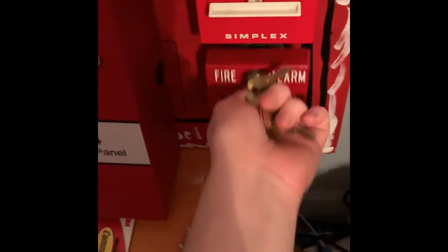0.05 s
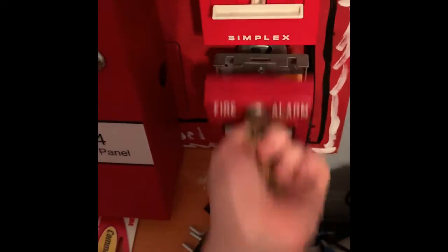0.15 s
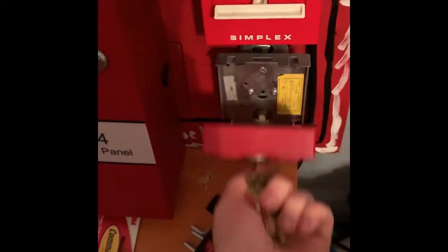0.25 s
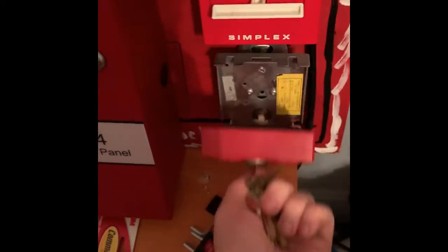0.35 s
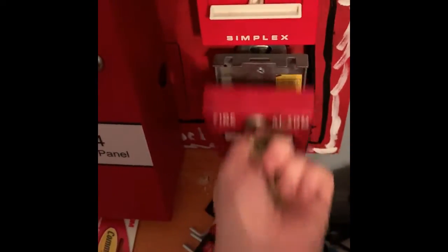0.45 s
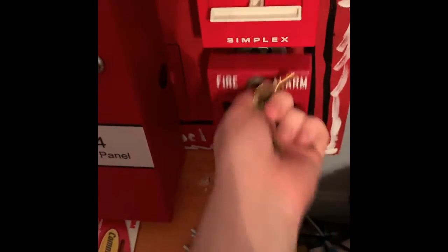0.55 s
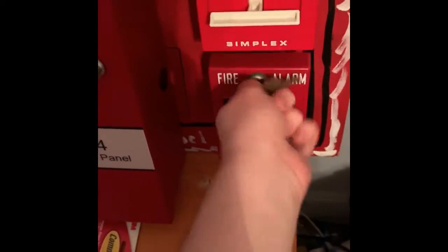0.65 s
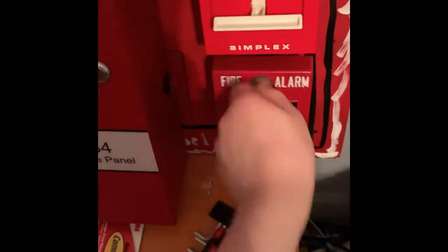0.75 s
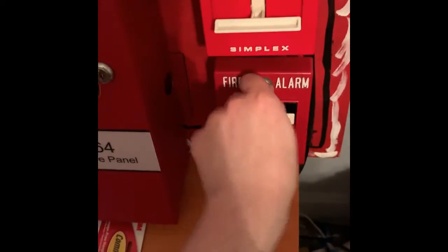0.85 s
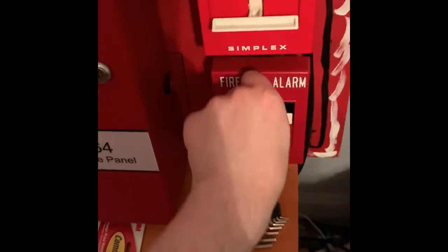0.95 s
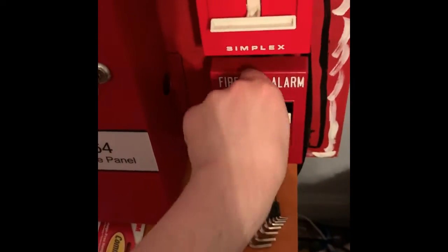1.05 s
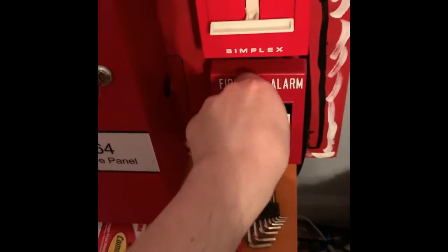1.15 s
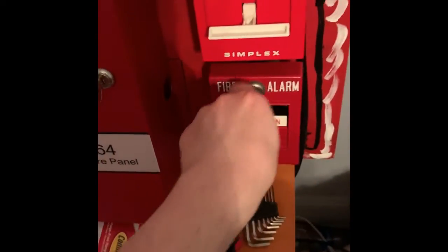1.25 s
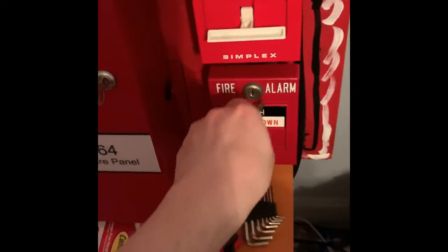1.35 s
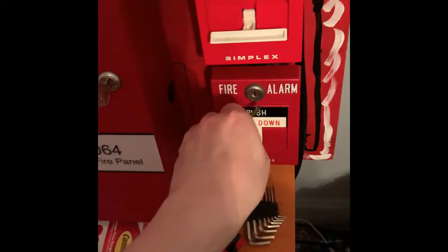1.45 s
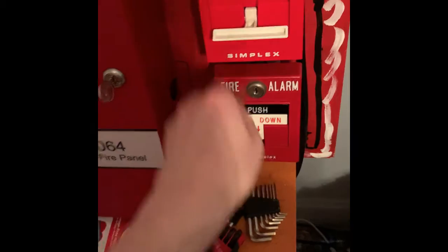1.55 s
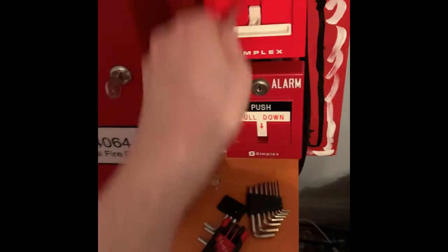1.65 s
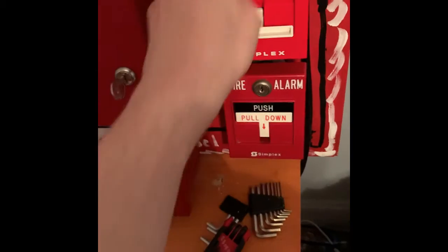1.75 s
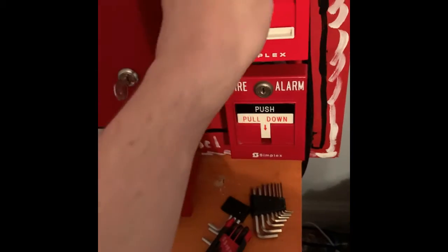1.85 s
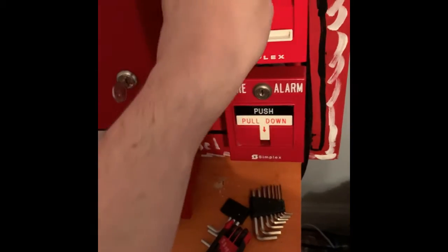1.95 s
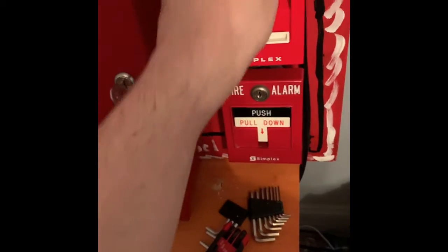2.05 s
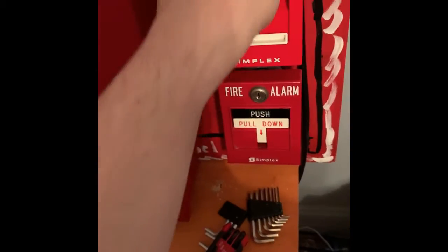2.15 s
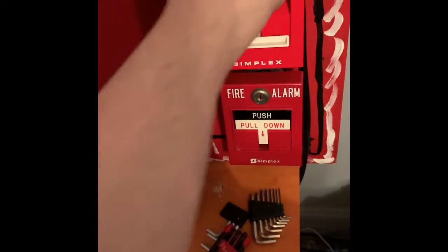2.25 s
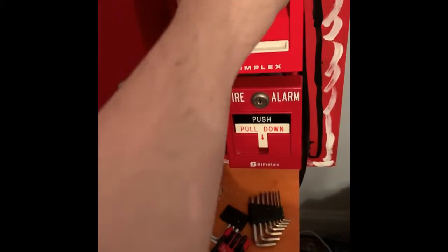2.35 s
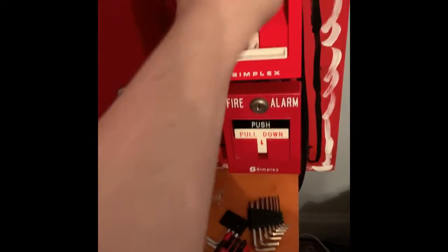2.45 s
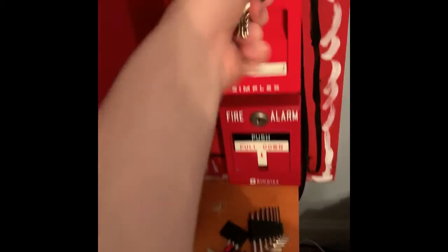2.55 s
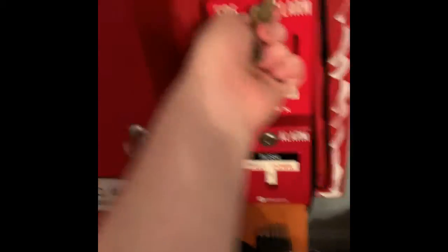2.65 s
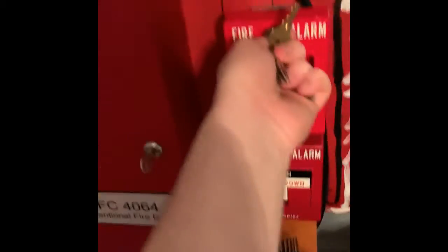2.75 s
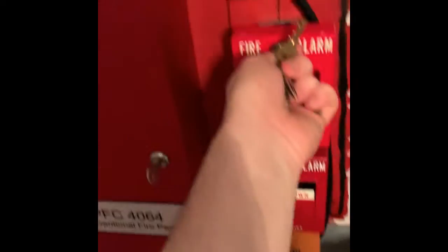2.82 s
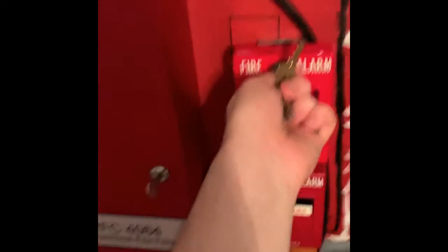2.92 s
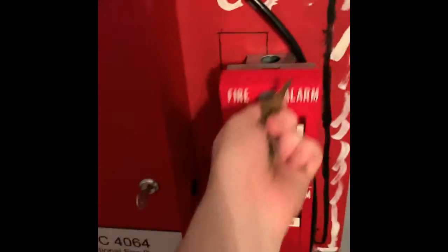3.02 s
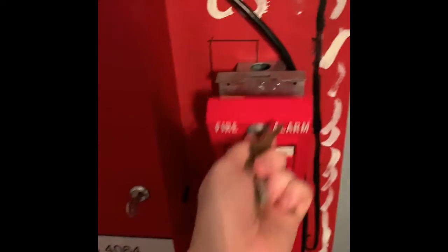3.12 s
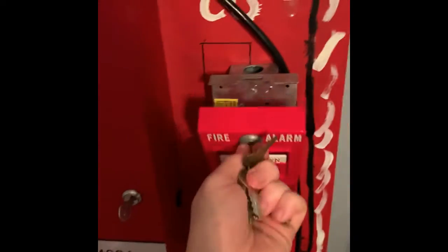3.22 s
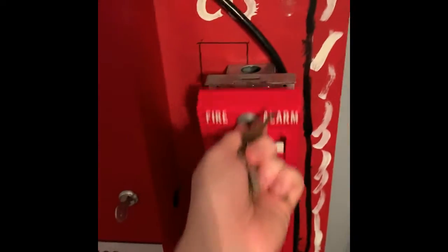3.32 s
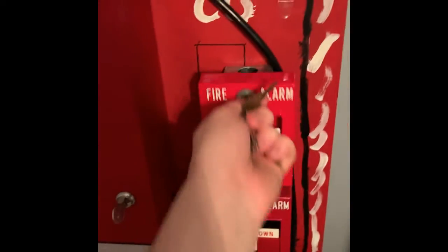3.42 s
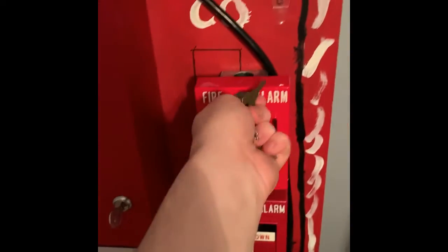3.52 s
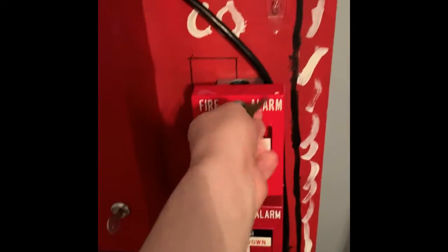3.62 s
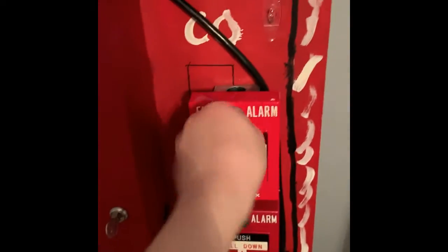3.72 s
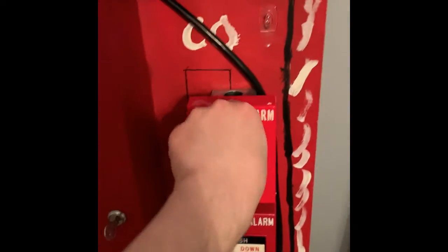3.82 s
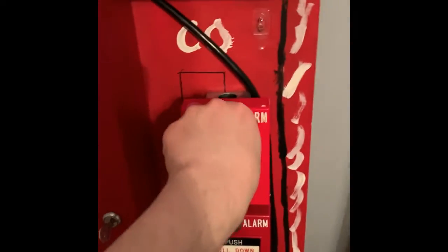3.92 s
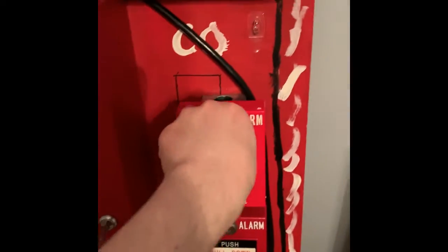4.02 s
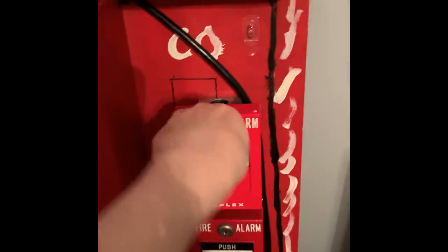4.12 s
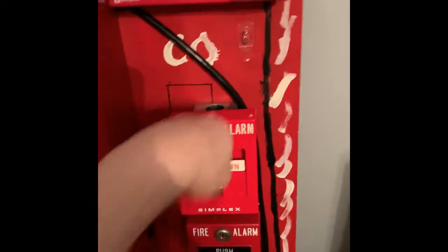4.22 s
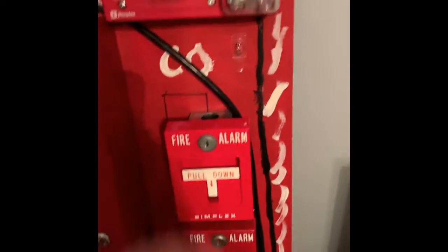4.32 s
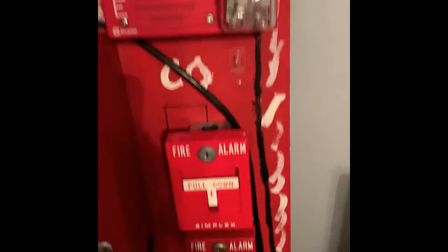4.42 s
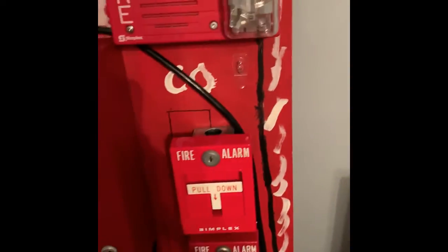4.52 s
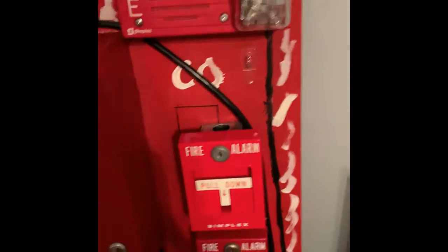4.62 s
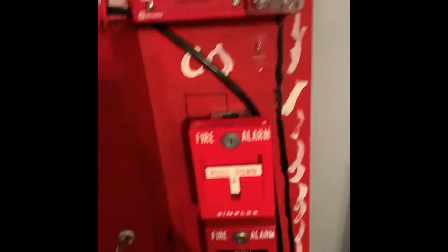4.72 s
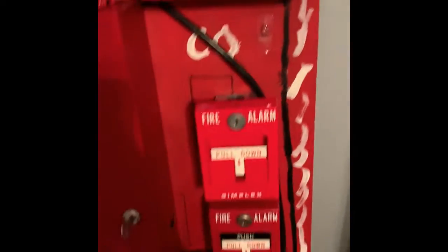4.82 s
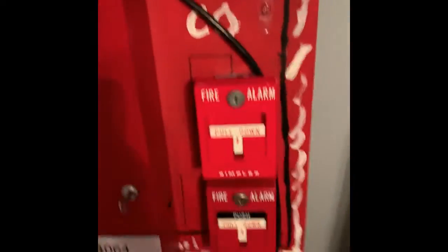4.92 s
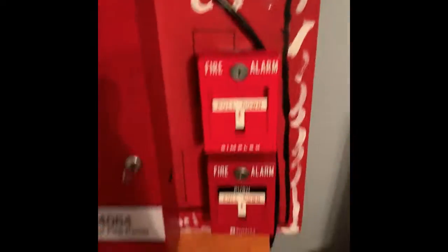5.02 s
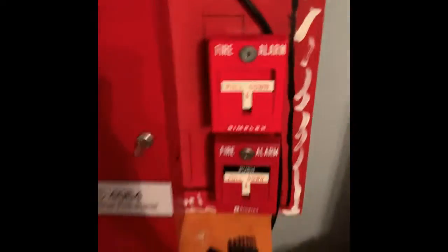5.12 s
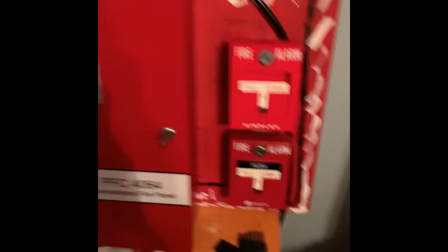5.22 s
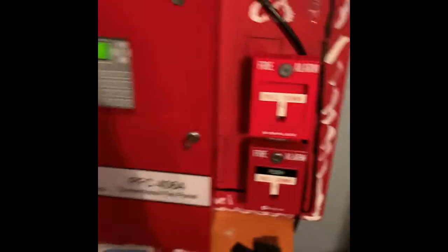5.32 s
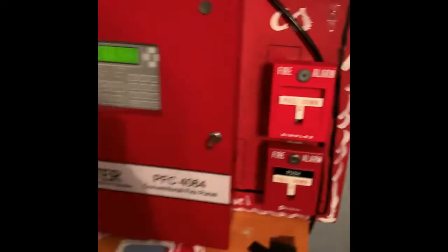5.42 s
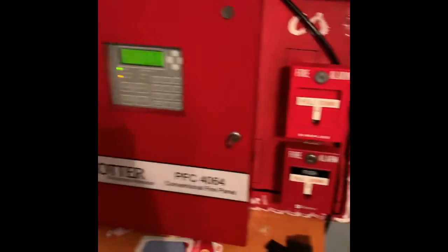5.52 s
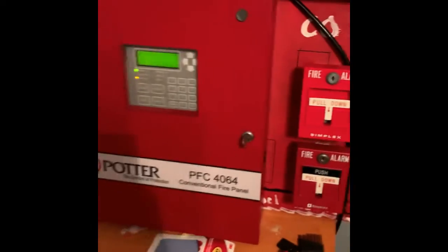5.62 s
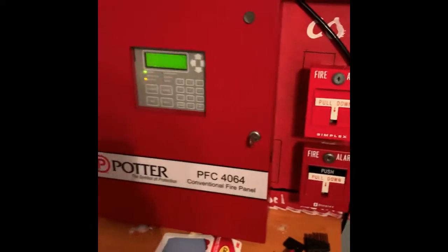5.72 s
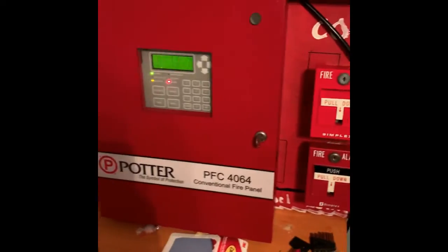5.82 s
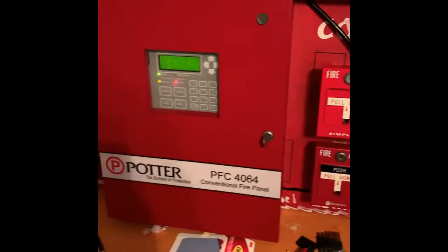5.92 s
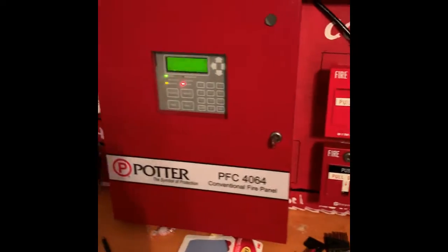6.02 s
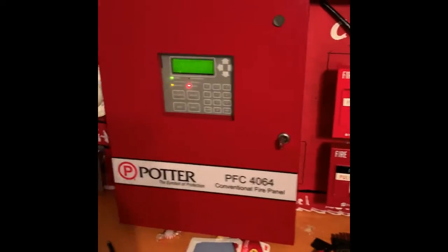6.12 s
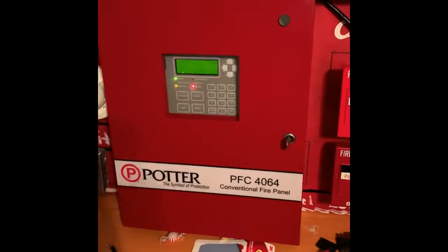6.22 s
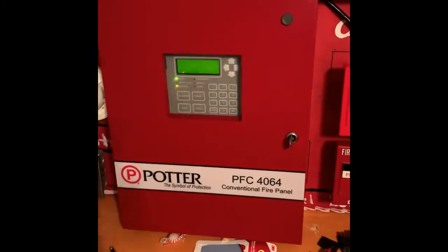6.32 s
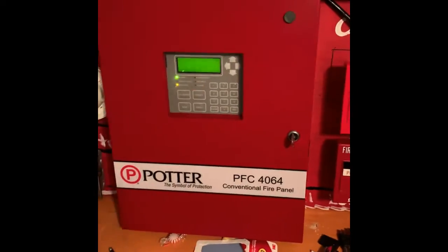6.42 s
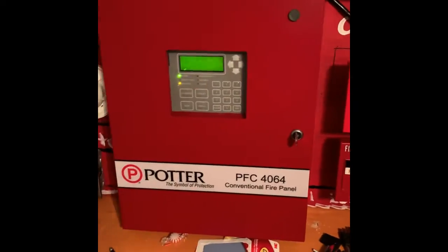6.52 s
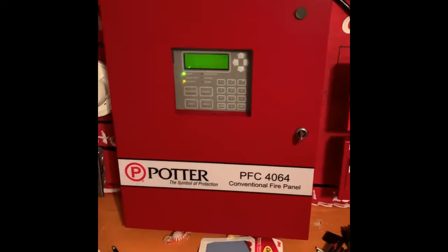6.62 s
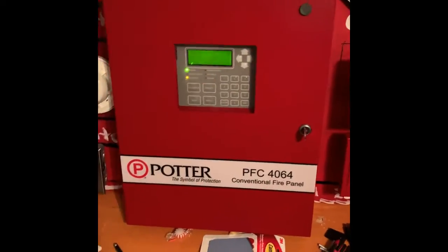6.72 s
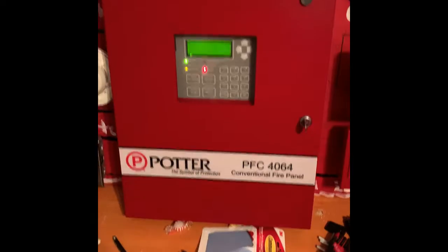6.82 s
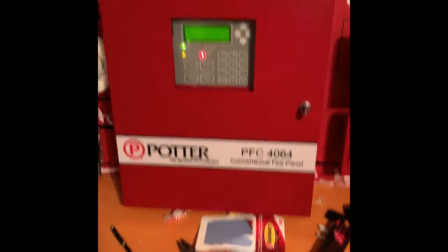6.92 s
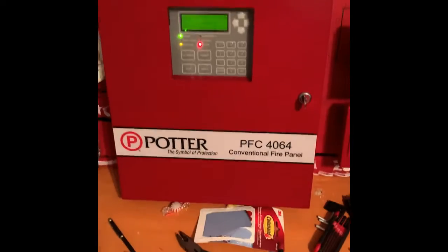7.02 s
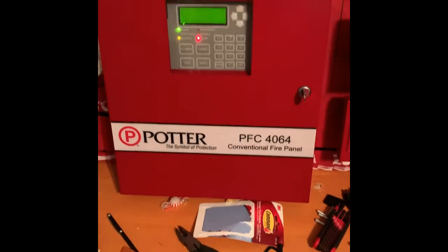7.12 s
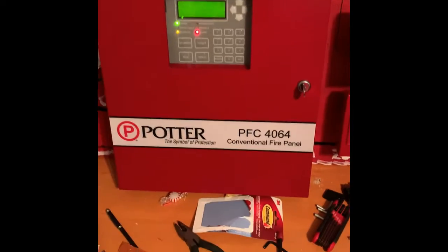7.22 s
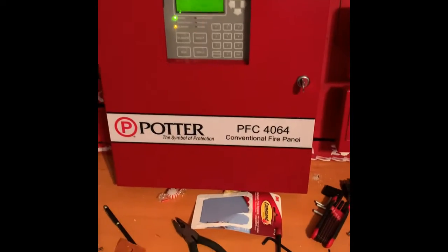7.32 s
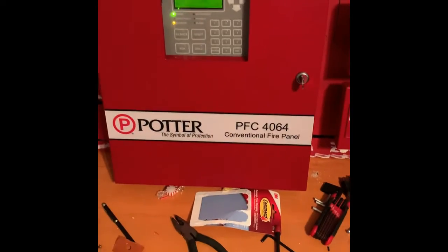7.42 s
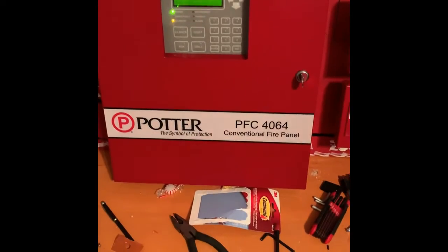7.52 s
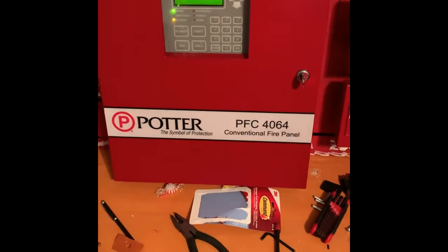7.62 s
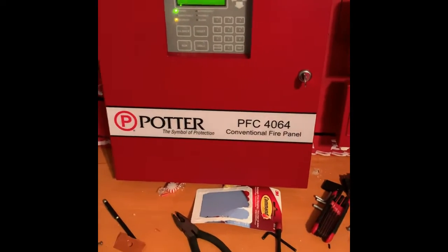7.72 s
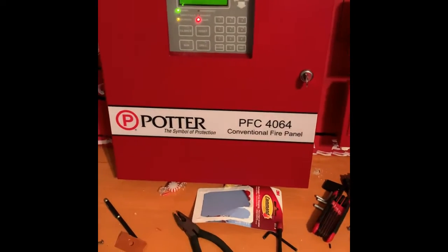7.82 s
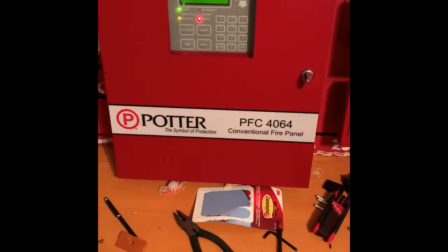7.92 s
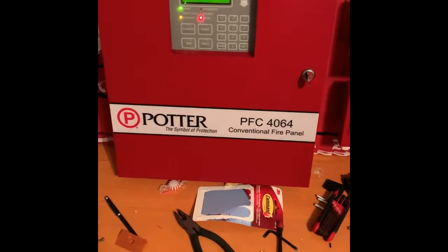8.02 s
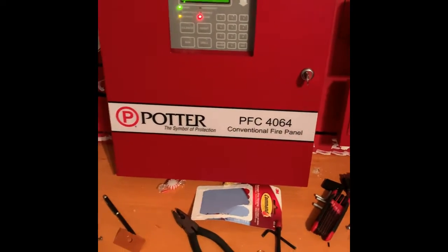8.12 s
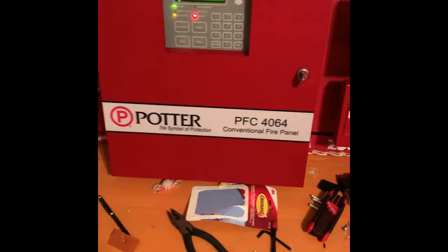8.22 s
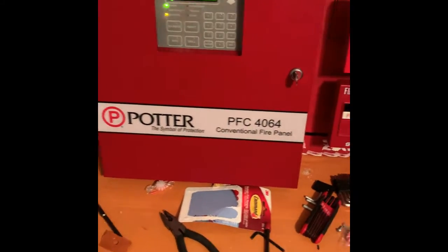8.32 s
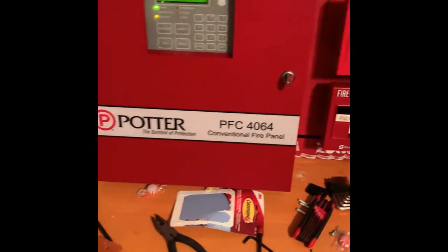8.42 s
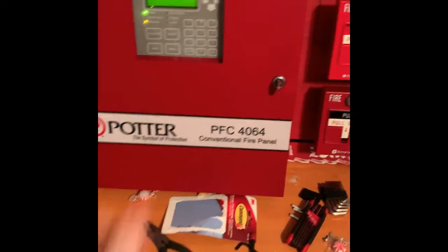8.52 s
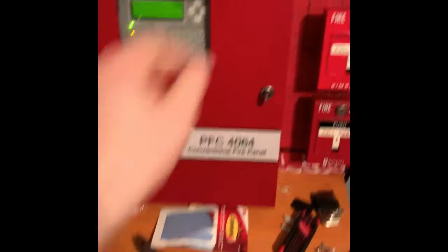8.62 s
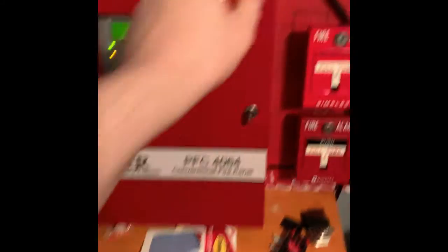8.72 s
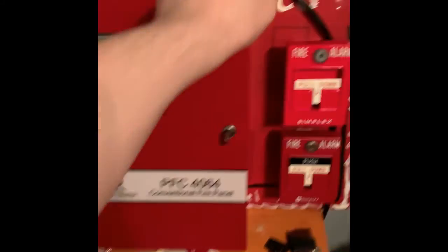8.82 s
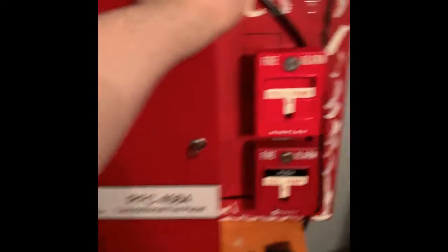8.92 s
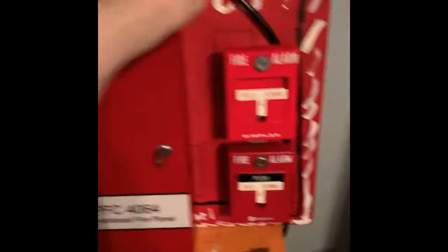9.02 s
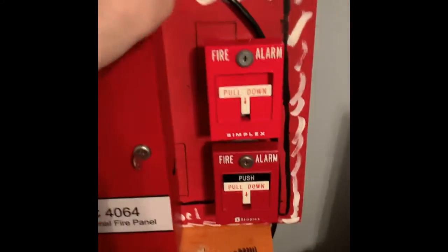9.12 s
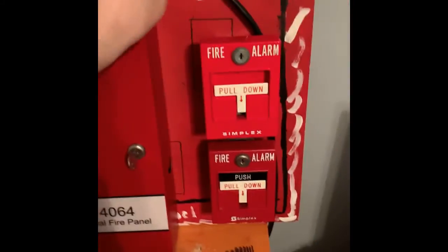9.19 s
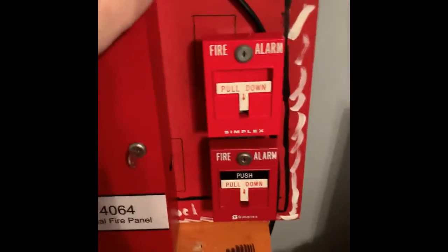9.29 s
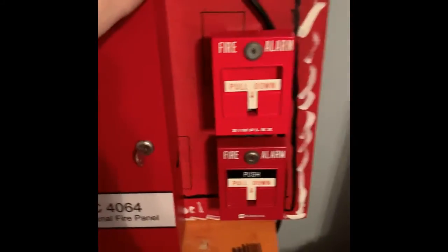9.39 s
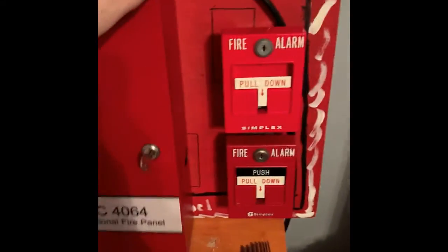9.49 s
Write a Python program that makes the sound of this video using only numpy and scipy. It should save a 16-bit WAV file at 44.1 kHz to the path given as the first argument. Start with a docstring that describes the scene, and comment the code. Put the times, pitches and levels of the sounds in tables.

```python
"""Two metal fire alarm pull stations are worked by a hand in a small room, close to the microphone.
A key slides into each lock and turns, the hinged cover drops open and is slammed shut, the key is drawn out.
Then a sleeve brushes past, the key ring jingles, and a few duller knocks come from the supporting board.
Impacts are noise bursts with decaying modes; friction is a train of random slips shaped by spectra and swells;
the rumble and room tone are filtered noise. Decaying noise serves as the echo of the room."""
import sys
import numpy as np
from scipy import signal
from scipy.fft import rfft, irfft, next_fast_len
from scipy.io import wavfile

SR = 44100
rng = np.random.default_rng(int(sys.argv[2]) if len(sys.argv) > 2 else 0)


def wav_record(signal):
    """Record a signal, one row per channel, as 16-bit PCM in the file named by sys.argv[1]."""
    frames = np.transpose(np.atleast_2d(signal))
    bounded = np.clip(frames, -1, 1)
    # unit amplitude maps onto the largest positive 16-bit level
    quanta = np.round(bounded * 32767).astype(np.int16)
    wavfile.write(sys.argv[1], SR, quanta)


N = 421155
TIME = np.arange(N) / SR
RING_TIME = np.arange(SR // 3) / SR

# Tables. Levels are relative: a source may add a common gain. Spectra are amplitude densities.
# strokes of key over pins and cover against housing:
# (strongest at [s], rise [s], fall [s], body level [dB], bright level [dB])
RUBS = [(0.03, 0.23, 0.021, -41, -57.5), (0.599, .05, .2, -40, -54.5), (0.696, 0.13, .03, -38, -48),
        (0.739, 0.027, .015, -37, -42.5), (0.92, 0.29, 0.09, -43, -53), (0.978, .03, .25, -52.5, -63.5),
        (1.289, .03, .06, -30, -30), (1.40, .04, 0.022, -39, -35.5), (1.464, .01, 0.039, -35.5, -33.5),
        (2.215, .01, .13, -41.5, -57.5), (2.37, .02, .12, -32.5, -33.5), (2.432, .06, 0.027, -24, -26.5),
        (2.565, .01, .1, -45, -62), (2.657, 0.072, 0.2, -37.5, -47.5), (3.138, 0.027, .012, -21, -21.5),
        (3.431, .02, 0.084, -51.5, -72), (3.52, 0.04, 0.026, -50, -63), (3.828, 0.047, .035, -37, -51),
        (3.9, 0.07, .012, -37.5, -43), (4.253, 0.0098, .04, -29.5, -29), (4.292, 0.036, .025, -29, -20),
        (4.322, 0.017, .02, -27.5, -30)]
# spectrum of the body of the friction: (frequency [Hz], level [dB])
RUB_BODY_SPECTRUM = [(150, -41.5), (250, -14.5), (351, -5.5), (451, -17.5), (1150, -11.5), (1430, -19),
                     (2000, -15.5), (2880, -25), (5000, -29), (6500, -68), (11000, -120)]
# spectrum of the bright part of the friction: (frequency [Hz], level [dB])
RUB_BRIGHT_SPECTRUM = [(2650, -43), (4500, -17), (5840, 2.5), (11800, -11.5), (13500, -15), (15300, -14.5),
                       (16100, -13.5), (16500, -35)]
# modes of the cast housing and its cover: (frequency [Hz], mean level [dB], t60 [s])
HOUSING_MODES = [(227.6, -9, 0.25), (355, -4.5, 0.11), (540, -10, 0.1), (640, 1, 0.099), (800, -0.5, 0.11),
                 (945, -0.5, 0.075), (1136, -4.5, .14), (1243, -5, 0.077), (1595, -5, 0.11),
                 (1837, 3, 0.11), (2033, 3, 0.039), (2623, -5, 0.21), (3220, -2.5, 0.091), (3820, -6, 0.14),
                 (3980, 6, .12), (4240, 8, .14), (5810, -3.5, 0.18), (6370, -5, .15), (6795, -7, 0.1),
                 (7815, -13.5, 0.095), (9730, -2.5, 0.076), (10200, -7, .1)]
# continuous handling rumble: (time [s], level [dB])
HANDLING = [(0, -47), (1.0, -45.5), (1.85, -53.5), (2.8, -44), (3.25, -60.5), (3.8, -49.5), (4.2, -57.5),
            (4.5, -51.5), (6.4, -66), (8.5, -63.5), (9.5, -50.5)]
# the hand pushes against the board: (strongest at [s], level [dB])
PUSHES = [(0.46, -47.5), (0.77, -36), (1.34, -34), (1.55, -32.5), (2.02, -33), (2.25, -34), (2.47, -25.5),
          (2.73, -39), (3.44, -44), (3.635, -29.5), (4.38, -35), (6.54, -46), (9.44, -33)]
# spectrum of the board's rumble: (frequency [Hz], level [dB])
RUMBLE_SPECTRUM = [(18, -35), (30, -15), (54, -3), (113, 2), (150, 5), (219, -6), (291, -19), (360, -3.5),
                   (455, -17), (500, -16.5), (650, -41), (1100, -120)]
# spectrum of the room tone: (frequency [Hz], level [dB])
AIR_SPECTRUM = [(15, -36.5), (25, -8.5), (123, 0.5), (145, -15.5), (217, -15.5), (277, -2.5), (384, -18.5),
                (416, -27), (476, -22), (607, -26.5), (840, -20), (1330, -29.5), (4030, -42.5),
                (8590, -41.5), (16000, -44)]
# blows of latch, cover, key and hand: (time [s], metal level [dB], brightness [dB per octave],
# board thud level [dB], single resonance [Hz], ringing [dB])
BLOWS = [(0.026, -50, -5, -45, 1580, 8), (0.226, -31.5, -1, -48, 980, 9), (0.238, -38, -3, -53, 1000, -0.5),
         (0.268, -17, 1.7, -32, 2000, -3.5), (0.291, -30, -2.5, -49, 640, -5.5),
         (0.482, -50.5, -1.5, -64.5, 330, -7), (0.653, -48.5, -4.5, -51, 330, 5),
         (0.705, -32.5, -3, -26.5, 330, 1.5), (0.752, -19.5, -0.9, -24, 1200, -8.5),
         (0.939, -45.5, -4.5, -32.5, 220, -18.5), (1.04, -52.5, -2.5, -45, 200, -8),
         (1.261, -37.5, .5, -33.5, 340, 5.5), (1.287, -40.5, 1.5, -40, 1190, -15),
         (1.331, -38.5, -4.5, -31, 350, -3), (1.396, -48.5, 4, -44, 250, -12),
         (1.441, -35.5, 1.1, -36, 370, 6), (1.459, -46.5, -3.5, -33, 320, -15),
         (1.522, -60, -4, -39, 170, -5.5), (1.987, -34, 1, -34, 2010, 0),
         (1.997, -22.5, -0.04, -26, 800, -1.5), (2.139, -41.5, -3.5, -64, 1150, 3),
         (2.158, -41.5, -0.5, -57, 1630, -3), (2.198, -39.5, -3.1, -44, 910, 3),
         (2.33, -28, -1.5, -42, 1083, -1), (2.352, -33.5, -1.85, -36, 923, 1.5),
         (2.44, -22.5, -1, -33, 1170, -3), (2.54, -47.5, -6.5, -65, 800, -9),
         (2.609, -55.5, -7.5, -42, 370, -6.5), (2.741, -54.5, -3, -59.5, 910, -1.5),
         (2.962, -65.5, -6, -70.5, 820, 0), (3.118, -27, -0.66, -36.5, 2080, 6),
         (3.145, -19.5, 2, -36, 400, -12.5), (3.5, -56.5, -3.5, -58.5, 1160, -0.5),
         (3.516, -58, -2, -55.5, 1030, 0), (3.564, -27, -0.5, -38.5, 2112, 1.5),
         (3.6, -19, 1, -24.5, 910, -9), (3.918, -35, 0.5, -46, 910, 0.5),
         (4.249, -36.5, 4.5, -54.5, 950, 31.5), (4.281, -33, 0, -48, 1100, 4),
         (4.334, -25, -1.7, -32.5, 1240, -3.5), (5.377, -59, -4.5, -46.5, 710, -1),
         (5.402, -59, -4.5, -69, 480, 6), (6.512, -76.5, -9.5, -53, 290, 4), (6.687, -70, 1, -72, 290, 1),
         (8.351, -53.5, -7, -46.5, 420, 2), (8.385, -64, -5.5, -66, 400, -2),
         (8.797, -81.5, -7, -48.5, 280, -17.5), (9.021, -73.5, -4, -68, 290, -15.5),
         (9.06, -68.5, -5, -59.5, 287, -4.5), (9.339, -45, -6, -30.5, 540, -6.5),
         (9.351, -41.5, -6, -29, 174, 14), (9.524, -89, -8, -44, 189, 5)]
# limits of the thud band and the three metal bands of a blow: (frequency [Hz])
BLOW_EDGES_HZ = [110, 450, 1500, 5000, 17000]
# mean spectrum of a metal-to-metal contact: (frequency [Hz], level [dB])
CONTACT_SPECTRUM = [(100, -10.5), (350, 4), (1100, 5.5), (1500, -0.5), (2100, 10.5), (4200, 6), (5200, -1),
                    (6200, -5.5), (8500, -14), (10200, -11.5), (13000, -18.5), (15300, -19), (17000, -25)]
# keys touching on the ring: (time [s], level [dB], pitch of a single key [Hz], its share [dB])
CLINKS = [(0.059, -51, 15300, -0.5), (0.104, -38.5, 15330, -5), (1.313, -39.5, 10200, -27),
          (1.376, -52, 6900, 11.5), (1.642, -62, 15200, -5.5), (1.654, -44, 9970, -4.5),
          (1.784, -42, 15700, -1), (1.824, -40, 7680, 5), (1.872, -51, 8490, -9), (1.909, -47, 15000, -17),
          (1.919, -41.5, 15030, 0), (2.636, -41, 15250, 8), (3.091, -50, 6530, 1), (4.293, -35, 6700, -5),
          (5.655, -49, 15030, -16), (5.668, -50, 15000, -5), (5.692, -45.5, 11500, 9),
          (5.818, -48.5, 14900, 12), (5.848, -49, 11500, 5), (5.905, -40.5, 11170, 0),
          (5.969, -59, 9500, -3), (6.127, -55, 14940, -12), (7.97, -60.5, 10500, -3),
          (8.086, -58, 8200, -2), (8.301, -54, 8650, -1), (8.877, -64, 6100, 1.5)]
# spectrum of a bunch of keys: (frequency [Hz], level [dB])
KEY_SPECTRUM = [(3000, -13), (5500, -12), (7500, -15), (8500, -0.5), (10200, -5), (11500, -1),
                (13000, -7.5), (14200, -1.5), (15100, 7), (16000, -3.5)]
# groans of the hinge, cover lifted or pressed: (strongest at [s], rise [s], fall [s], level [dB])
GROANS = [(0.425, 0.083, 0.072, -43), (0.65, .2, 0.052, -40), (2.6, .04, .12, -43)]
# the cover hits its stop and the spring inside buzzes on: (time [s], level [dB])
SPRING_HITS = [(.270, -40), (3.146, -38)]
# strength of the spring's modes: (frequency [Hz], level [dB])
SPRING_SPECTRUM = [(600, -15), (1500, -6), (4200, 1.5), (6500, -2.5), (10000, -9), (15000, -22.5)]
# shakes of the bunch of keys: (strongest at [s], rise [s], fall [s], level [dB])
SHAKES = [(1.76, 0.11, 0.041, -60), (1.935, .01, 0.059, -51), (5.668, 0.047, 0.098, -45),
          (5.83, 0.052, 0.087, -55), (5.92, .05, 0.12, -50), (6.06, .06, 0.052, -57),
          (6.175, .06, .025, -60), (7.865, .02, .08, -65.5), (8.07, 0.043, .07, -60),
          (8.225, .01, .05, -67), (8.31, 0.044, 0.079, -56), (8.372, 0.033, .05, -61)]
# faint dry ticks of the handling: (time [s], level [dB], pitch [Hz])
TICKS = [(4.73, -80, 6000), (7.035, -80, 3900), (7.994, -64, 3700), (8.594, -74, 2700), (8.878, -63, 3300)]
# a sleeve brushes past as the arm moves: (strongest at [s], rise [s], fall [s], level [dB])
BRUSHES = [(4.99, 0.043, 0.063, -54), (5.185, .015, .11, -57.5), (5.235, .04, .05, -58),
           (5.33, .015, .07, -62), (5.425, .04, .08, -61), (6.69, .04, 0.075, -67), (6.9, .03, .06, -76),
           (9.1, .08, 0.16, -66)]
# spectrum of the cloth: (frequency [Hz], level [dB])
SLEEVE_SPECTRUM = [(300, -15), (1000, -0.5), (2000, 0.5), (3500, -2.5), (7000, -9.5), (11000, -16),
                   (16000, -20)]
# reverberation time of the room: (frequency [Hz], t60 [s])
ROOM_T60 = [(150, 0.27), (500, 0.23), (1500, 0.28), (3500, 0.37), (7000, 0.19), (11000, 0.11),
            (16000, 0.092)]
# phase by which the left microphone port leads: (frequency [Hz], phase [radians])
PORT_PHASE = [(200, -0.0), (900, -0.5), (1300, -0.4), (1750, 0.7), (3300, 1.4), (4700, 3.2), (6700, 6.3),
              (8450, 6.4), (9350, 12.3), (11500, 12.7), (12750, 13.8), (13850, 18.5), (15000, 18.7)]

# a movement fades by SWELL_DB at one rise time before and one fall time after its strongest moment;
# a curve above 1 rounds the top and steepens the ends
SWELL_DB, SWELL_CURVE = 20, 1.2
# a duller blow is a softer one: contact time doubles for each step of lost brightness (dB per octave)
HARD_CONTACT_S, SOFTENING_STEP_DB = .0015, 3.5
# the parts graze each other around each blow, in proportion to it
GRAZE_RISE_S, GRAZE_FALL_S, GRAZE_BODY_DB, GRAZE_BRIGHT_DB = .01, .003, -6.5, -8.5
PUSH_RISE_S, PUSH_FALL_S = 0.086, 0.084
# after every blow the board rumbles on, in proportion to the thud
RUMBLE_SHARE_DB, RUMBLE_LAG_S, RUMBLE_RISE_S, RUMBLE_FALL_S = -12, 0.015, .025, .13
AIR_DB = -61.5
HINGE_HZ, HINGE_WIDTH_HZ = 340, 70
CUTOFF_HZ = 16200


def from_db(db):
    """Amplitude ratio: 20 dB is a factor of ten."""
    return 10 ** (np.asarray(db) / 20)


def rms_one(x):
    """Power normalisation: scale to rms 1."""
    return x / np.sqrt(np.mean(x ** 2) + 1e-20)


def unit_burst(x):
    """Energy normalisation: scale a short sound to the energy of 30 ms at rms 1."""
    return x / np.sqrt(np.sum(x ** 2) / (.03 * SR) + 1e-20)


def at_hz(points, hz):
    """Logarithmic frequency scale: interpolate a table along it."""
    points = np.array(points)
    return np.interp(np.log(np.maximum(hz, 1)), np.log(points[:, 0]), points[:, 1])


def band(x, low_hz, high_hz, order=2):
    """Band limitation by a causal filter."""
    edges_hz = [low_hz, min(high_hz, .45 * SR)]
    sos = signal.butter(order, edges_hz, "band", fs=SR, output="sos")
    return signal.sosfilt(sos, x + 1e-18)


def coloured(x, spectrum):
    """Spectral weighting: multiply the spectrum of x by a table, then scale to rms 1."""
    size = next_fast_len(len(x))
    hz = np.arange(size // 2 + 1) * SR / size
    weighted = rfft(x, size) * from_db(at_hz(spectrum, hz))
    return rms_one(irfft(weighted, size)[:len(x)])


def add(track, s, sound):
    """Superposition: mix a sound into a track from time s."""
    start = max(round(s * SR), 0)
    track[start:start + len(sound)] += sound[:N - start]


def dying(t60):
    """Exponential decay: the envelope falls 60 dB in t60."""
    return from_db(-60 * RING_TIME / t60)


def ringing(modes, spread_db, t=RING_TIME):
    """Modal superposition: the contact point sets how strongly each decaying mode is excited."""
    hz, level_db, t60 = np.array(modes).T[:, :, None]
    strength = from_db(level_db + spread_db * rng.standard_normal(hz.shape))
    strength = strength * rng.choice([-1, 1], hz.shape)
    phase = (2 * np.pi * hz * t).astype("f")
    fall = (np.log(1000) * t / t60).astype("f")
    return np.sum(strength * np.exp(-fall) * np.sin(phase), axis=0)


def crowd(spectrum, low_hz, high_hz, t60, count):
    """Modal density: an irregular part has scattered modes, and the high ones tend to die first."""
    hz = rng.uniform(low_hz, high_hz, count)
    lasting = rng.uniform(.7, 1.3, count) * (hz / hz.mean()) ** -.3
    return np.transpose([hz, at_hz(spectrum, hz), t60 * lasting])


def slips(per_s, size_db):
    """Random impulse process: tiny contacts at random moments, a few much stronger than the rest."""
    sizes = from_db(size_db * np.minimum(rng.exponential(1, N), 4))
    return (rng.random(N) < per_s / SR) * sizes * rng.choice([-1, 1], N)


def swells(movements):
    """Power summation: gain of movements (strongest at [s], rise [s], fall [s], level [dB])."""
    power = np.zeros(N)
    for s, rise_s, fall_s, level_db in movements:
        t = np.arange(max(-2 * rise_s, -s), 2 * fall_s, 1 / SR)
        distance = np.maximum(-t / rise_s, t / fall_s)
        add(power, s + t[0], from_db(level_db - SWELL_DB * distance ** SWELL_CURVE) ** 2)
    return np.sqrt(power)


def grating(x, patchy_db, catches_per_s):
    """Band modulation: as the contact moves, each band of about a third of an octave varies by itself."""
    out, edges = 0, np.geomspace(280, 16500, 17)
    for low, high in zip(edges, edges[1:]):
        catches = from_db(patchy_db * rng.standard_normal(1000))
        gain = np.interp(TIME * catches_per_s, np.arange(len(catches)), catches)
        out = out + band(x, low, high) * gain
    return out


def rubbing(slips_per_s=700, size_db=2.5, ring_db=-10.0, body_db=-2.0, bright_db=-4.5):
    """Dry friction: a run of tiny uneven slips, each a scratch that also rings the housing."""
    scratch = unit_burst(rng.standard_normal(len(RING_TIME)) * dying(0.017))
    response = scratch + from_db(ring_db) * unit_burst(ringing(HOUSING_MODES, spread_db=0.0))
    scraping = signal.oaconvolve(slips(slips_per_s, size_db), response)[:N]
    grain = grating(scraping, patchy_db=2.5, catches_per_s=55)
    grazes = [(s, GRAZE_RISE_S, GRAZE_FALL_S, db + GRAZE_BODY_DB, db + GRAZE_BRIGHT_DB)
              for s, db, *_ in BLOWS]
    strokes = RUBS + grazes
    body = coloured(grain, RUB_BODY_SPECTRUM) * swells([(*timing, db) for *timing, db, _ in strokes])
    bright = coloured(grain, RUB_BRIGHT_SPECTRUM) * swells([(*timing, db) for *timing, _, db in strokes])
    return from_db(body_db) * body + from_db(bright_db) * bright


def background(rumble_db=-5.0, air_db=0.0):
    """Forced vibration: the board rumbles with each push and after each blow, over a steady room tone."""
    pushes = [(s, PUSH_RISE_S, PUSH_FALL_S, db) for s, db in PUSHES]
    jolts = [(s + RUMBLE_LAG_S, RUMBLE_RISE_S, RUMBLE_FALL_S, thud_db + RUMBLE_SHARE_DB)
             for s, _, _, thud_db, _, _ in BLOWS]
    handling = from_db(np.interp(TIME, *np.transpose(HANDLING)))
    shaking = np.hypot(handling, swells(pushes + jolts))
    rumble = from_db(rumble_db) * shaking * coloured(rng.standard_normal(N), RUMBLE_SPECTRUM)
    air = from_db(AIR_DB + air_db) * coloured(rng.standard_normal(N), AIR_SPECTRUM)
    return rumble + air


def contact_noise(spectrum, ripple_db):
    """Local variation of contact: noise with random peaks and dips around a common spectrum."""
    hz = np.linspace(10, 130, 90) ** 2
    own_db = at_hz(spectrum, hz) + ripple_db * rng.standard_normal(len(hz))
    return coloured(rng.standard_normal(len(RING_TIME)), np.transpose([hz, own_db]))


def chatter(contact_s, bounce_db=-6.5, count=4):
    """Repeated impact: loose metal lands, then bounces a few times, ever more weakly."""
    # a soft contact starts slowly and lasts longer
    touch = (1 - np.exp(-(RING_TIME / contact_s) ** 2)) * dying(.014 + 7 * contact_s)
    power, delay = touch ** 2, 0
    for k in range(1, count):
        delay += k * rng.uniform(.002, .0045)
        bounce = from_db(bounce_db * k) * np.interp(RING_TIME - delay, RING_TIME, touch, left=0)
        power = power + bounce ** 2
    return np.sqrt(power)


def blows(shudder_t60=0.22, ring_db=-3.5, shudder_db=-1.0, note_db=-5.0, note_t60=0.16, thud_lag_s=.003):
    """Impact excitation: a chattering crack rings the housing and one added resonance; loose parts shudder."""
    out = np.zeros(N)
    crack_db = [-13.5, 4.5, 2.5, 8.0]   # weight of the crack in each band, greatest in the treble
    # lower edges of the three metal bands, relative to that of the middle one
    octaves = np.log2(np.array(BLOW_EDGES_HZ[1:4]) / BLOW_EDGES_HZ[2])
    for s, metal_db, brightness_db, thud_db, hz, ringing_db in BLOWS:
        contact_s = HARD_CONTACT_S * 2 ** (max(-brightness_db, 0) / SOFTENING_STEP_DB)
        grain = contact_noise(CONTACT_SPECTRUM, ripple_db=3.0)
        crack = unit_burst(grain * chatter(contact_s))
        tail = from_db(ring_db) * unit_burst(ringing(HOUSING_MODES, spread_db=6.5))
        tail += from_db(note_db) * unit_burst(np.sin(2 * np.pi * hz * RING_TIME) * dying(note_t60))
        tail += from_db(shudder_db) * unit_burst(grain[::-1] * dying(shudder_t60))
        tail *= from_db(ringing_db) * (1 - np.exp(-(RING_TIME / contact_s) ** 2))
        band_db = [thud_db, *(metal_db + brightness_db * octaves)]
        for k, level_db in enumerate(band_db):
            part = band(tail + from_db(crack_db[k]) * crack, *BLOW_EDGES_HZ[k:k + 2], order=3)
            start = s - contact_s / 2 + thud_lag_s * (k == 0)   # the heavy board follows late
            add(out, start, from_db(level_db) * unit_burst(part))
    return out


def clinks(tick_t60=0.026, tick_db=9, bunch_t60=.14, key_t60=0.11, rise_s=0.00063, level_db=-1.0):
    """Impulsive excitation of small bodies: a tick sets keys ringing, with new random modes each time."""
    out = np.zeros(N)
    for s, clink_db, hz, key_db in CLINKS:
        noise = contact_noise(KEY_SPECTRUM, ripple_db=0.0)
        tick = unit_burst(band(noise, 2800, 19000) * dying(tick_t60))
        key = unit_burst(np.sin(2 * np.pi * hz * RING_TIME) * dying(key_t60))
        # a small key radiates its low modes poorly
        key *= min(hz / 6500, 1) ** 2
        modes = crowd(KEY_SPECTRUM, 5500, 16000, bunch_t60, count=50)
        bunch = unit_burst(ringing(modes, spread_db=1.0))
        clink = bunch + from_db(tick_db) * tick + from_db(key_db) * key
        clink *= 1 - np.exp(-RING_TIME / rise_s)
        add(out, s, from_db(clink_db + level_db) * unit_burst(clink))
    return out


def hinge(slips_per_s=250, size_db=2.0):
    """Stick-slip excitation: the hinge sticks and slips, and drives a low resonance of the cover."""
    low_hz, high_hz = HINGE_HZ - HINGE_WIDTH_HZ / 2, HINGE_HZ + HINGE_WIDTH_HZ / 2
    groan = band(slips(slips_per_s, size_db), low_hz, high_hz)
    return rms_one(groan) * swells(GROANS)


def spring(t60=1.0):
    """Light damping: hundreds of modes of a coil spring ring on as it rattles against the housing."""
    out = np.zeros(N)
    modes = crowd(SPRING_SPECTRUM, 590, 14000, t60, count=300)
    modes[:, 2] *= np.minimum(1, (5000 / modes[:, 0]) ** .5)   # shorter decay above 5 kHz
    for s, level_db in SPRING_HITS:
        buzz = ringing(modes, spread_db=0.5, t=np.arange(SR) / SR)
        add(out, s, from_db(level_db) * buzz / np.std(buzz[:SR // 20]))   # scaled by its first 50 ms
    return grating(out, patchy_db=2.5, catches_per_s=30)


def jingle(touches_per_s=80, t60=0.023, level_db=-1.5):
    """Random modal excitation: each shaken key brushes its neighbours and rings with its own modes."""
    keys = 0
    for key in range(4):
        ring = ringing(crowd(KEY_SPECTRUM, 3500, 12000, t60, count=70), spread_db=0.5)
        touches = slips(touches_per_s, size_db=3.5)
        keys = keys + signal.oaconvolve(touches, ring)[:N]
    return from_db(level_db) * rms_one(keys) * swells(SHAKES)


def ticks(t60=.025, width=.2):
    """Band-limited transient: a light touch is a brief noise around one pitch."""
    out = np.zeros(N)
    for s, level_db, hz in TICKS:
        noise = rng.standard_normal(len(RING_TIME)) * dying(t60)
        touch = band(noise, hz * (1 - width), hz * (1 + width))
        add(out, s, from_db(level_db) * unit_burst(touch))
    return out


def sleeve(fibres_per_s=2500, size_db=-1.0):
    """Friction of textiles: countless catching fibres sum to a soft hiss."""
    return coloured(slips(fibres_per_s, size_db), SLEEVE_SPECTRUM) * swells(BRUSHES)


def room(x, build_s=0.0027):
    """Reverberation: dense reflections build up fast and decay at their own rate in about each octave."""
    t, edges = np.arange(SR * 2 // 3) / SR, np.geomspace(80, 18000, 9)
    echo = 0
    for low, high in zip(edges, edges[1:]):
        t60 = at_hz(ROOM_T60, np.sqrt(low * high))
        echo = echo + band(rng.standard_normal(len(t)), low, high) * np.exp(-np.log(1000) * t / t60)
    echo *= 1 - np.exp(-(t / build_s) ** 2)
    return signal.fftconvolve(x, echo / np.sqrt(np.sum(echo ** 2)))[:N]


def two_ports(x):
    """Phase difference: it varies with frequency between two ports; the left is weaker."""
    size = next_fast_len(N + SR // 10)
    hz = np.arange(size // 2 + 1) * SR / size
    lead = np.interp(hz, *np.transpose(PORT_PHASE))
    left = from_db(-.8) * x
    right = irfft(rfft(x, size) * np.exp(-1j * lead), size)[:N]
    return np.array([left, right])


def scene(room_db=-12.0, key_room_db=-8.0):
    """Direct and reverberant fields: stations and keys close by, with a little of the room around them."""
    station = rubbing() + blows() + hinge() + spring() + ticks() + sleeve()
    keys = clinks() + jingle()
    wet = room(from_db(room_db) * station + from_db(key_room_db) * keys)
    # diffuse sound differs a little between the ports: it enters them with opposite signs
    diffuse = from_db(-16) * room(band(station + keys, 450, 16000)) + from_db(-21) * background()
    return two_ports(station + keys + wet + background()) + diffuse * np.array([[1], [-1]])


def record(dry):
    """Saturation and band limitation: the highest peaks are rounded and the top is cut."""
    low_pass = signal.ellip(10, .2, 80, CUTOFF_HZ, fs=SR, output="sos")
    return signal.sosfilt(low_pass, np.tanh(dry))


dry = scene()
out = record(dry)
wav_record(out)
```